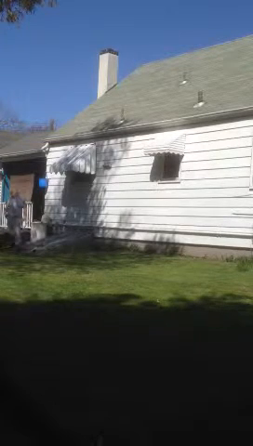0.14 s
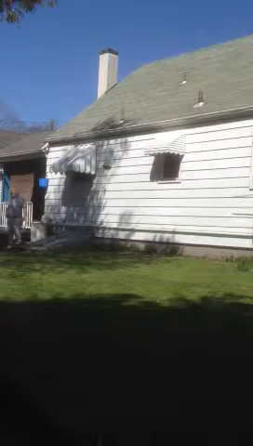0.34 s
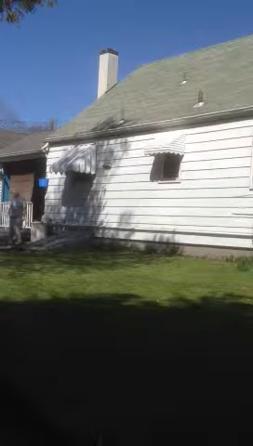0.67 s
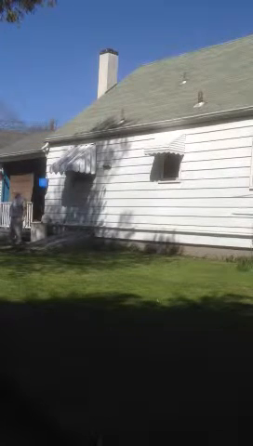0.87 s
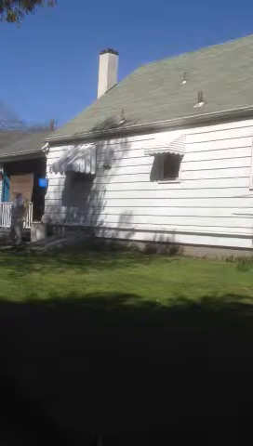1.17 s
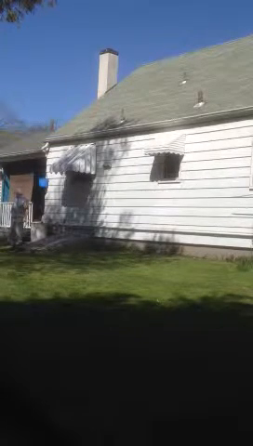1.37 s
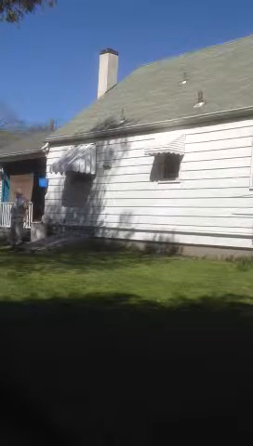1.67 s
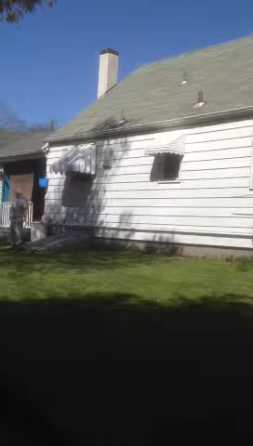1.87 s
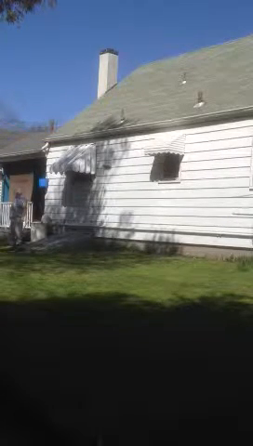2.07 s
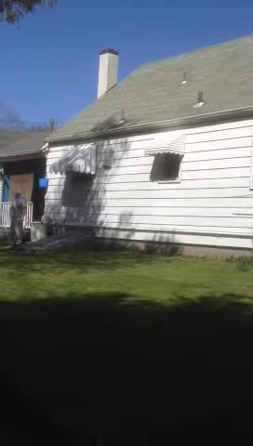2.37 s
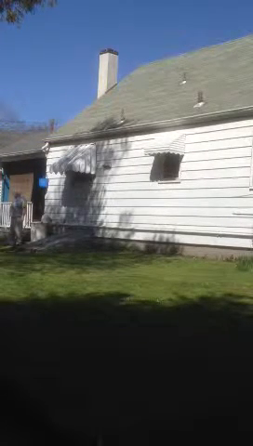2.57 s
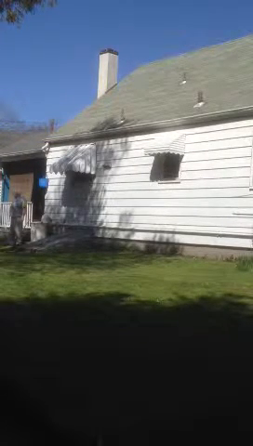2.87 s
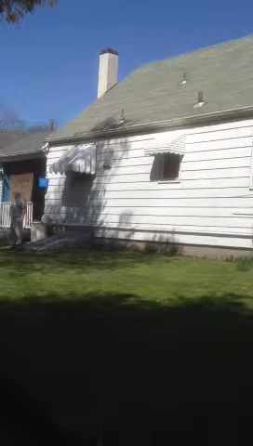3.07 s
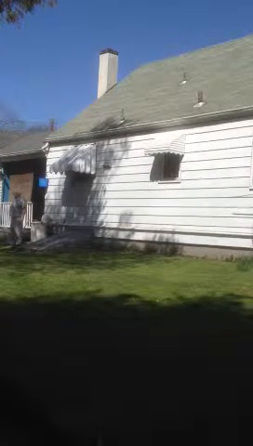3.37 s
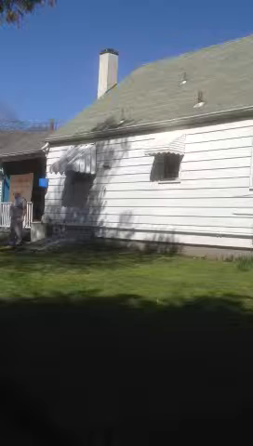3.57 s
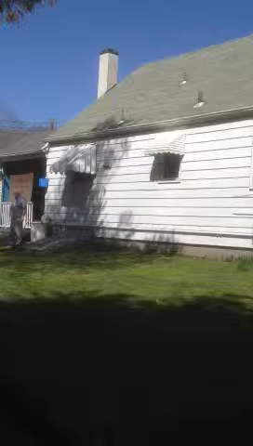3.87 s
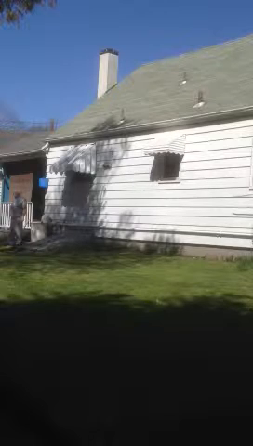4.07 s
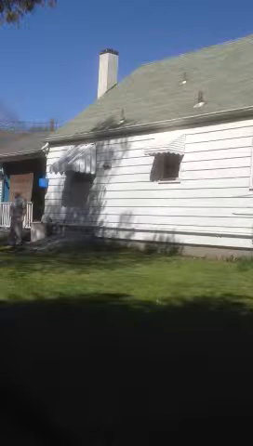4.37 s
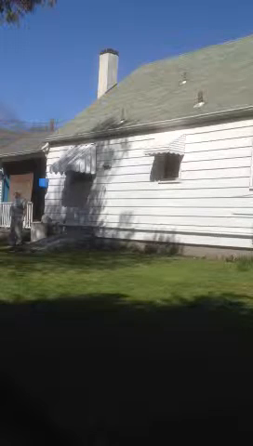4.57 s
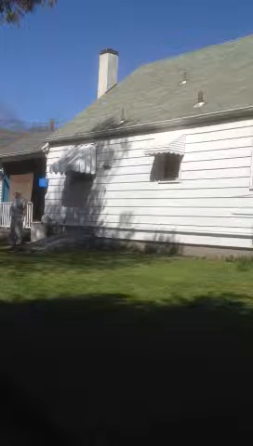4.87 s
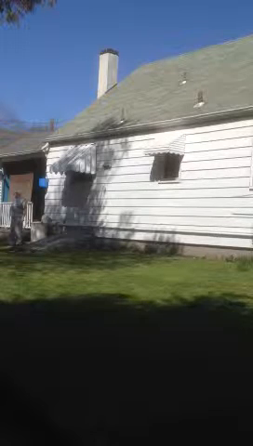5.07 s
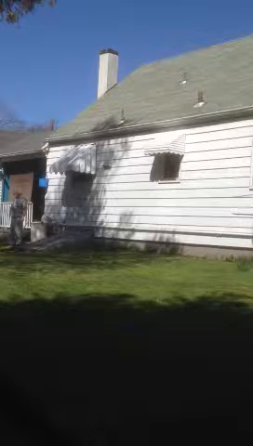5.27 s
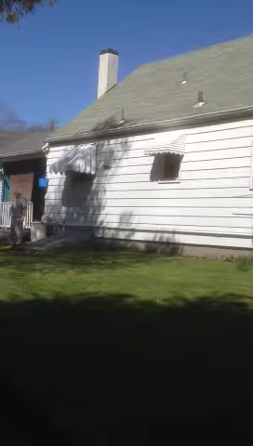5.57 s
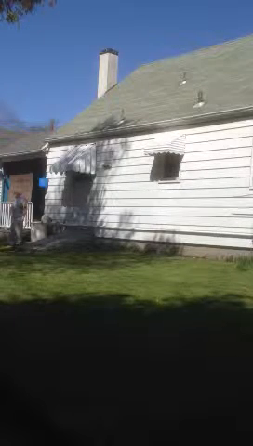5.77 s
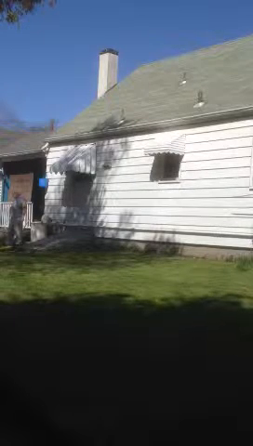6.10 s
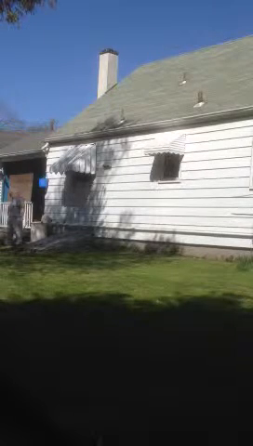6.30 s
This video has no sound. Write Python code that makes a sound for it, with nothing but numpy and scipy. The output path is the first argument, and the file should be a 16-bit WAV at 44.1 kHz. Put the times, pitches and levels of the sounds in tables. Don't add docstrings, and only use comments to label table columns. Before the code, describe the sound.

Open yard beside a house, heard through a phone microphone with its top treble rolled off. From 0 s a small one-cylinder lawn tractor runs steadily, about twenty-seven firings per second, a low buzzing throb coloured by pipe and wall echoes, with bright cooling-air hiss, belt fizz and singing panels. Loose deck metal rattles in the first 0.2 s and again near 1.8 and 2.7 s; a thin bird chip falls around 0.4 s. The hiss recedes until about 2 s, when the tone shifts slightly as it passes the house corner. Near 4 s the ignition is cut: the pitch drops and unburnt air puffs and wheezes through the muffler, louder and hollow around 4.3-4.9 s, stalling near 5.1 s. The residue fades quickly. A small bright latch snap comes at 5.5 s, a faint high chip at 6.15 s, over quiet yard air and a far, slow engine idle.

```python
import sys
import numpy as np
from scipy import signal
from scipy.fft import rfft, irfft
from scipy.io import wavfile
from scipy.ndimage import uniform_filter1d

SR = 44100
rng = np.random.default_rng(int(sys.argv[2]) if len(sys.argv) > 2 else 0)


def amplitude_ratio(level_db):
    exponent = np.asarray(level_db, float) / 20
    return 10 ** exponent


def master_out(mix):
    frames = np.transpose(np.atleast_2d(mix))
    ceiling = np.clip(frames, -1, 1)
    pcm = np.round(ceiling * 32767).astype(np.int16)
    wavfile.write(sys.argv[1], SR, pcm)


N = 284004

# [t/s, engine cycle rate/Hz]
GOVERNED = [(0, 26.6), (.14, 26.8), (.4, 26.35), (.66, 27.2), (.9, 26.9), (1.1, 26.5), (1.5, 26.95),
            (1.88, 27.3), (2.06, 27.1), (2.5, 27.33), (2.7, 27.6), (2.88, 27.36), (3.85, 27.4),
            (4.0, 27.05)]
# [t/s, engine cycle rate/Hz]
COASTDOWN = [
    (4.15, 25.9),
    (4.55, 21.45),
    (4.7, 20.15),
    (5.0, 17.3),
]
SLOWING_PER_S = 10
CUT_S, BURN_OUT_S, STALL_S = 3.98, 0.25, 5.12
TURN_S, TURN_LENGTH_S, WAY_BEFORE, WAY_AFTER = 1.976, 0.21, 0.11, 1
SHADED_DB = -3

# [t/s, level/dB]
EXHAUST = [(0, -23.5), (.35, -23), (1.7, -26), (3.7, -27.5), (4.15, -24), (4.28, -19.5), (4.38, -19),
           (4.46, -20.5), (4.56, -17), (4.66, -23), (4.73, -20), (4.88, -20.5), (5.0, -22.5), (5.14, -26.5),
           (5.22, -34), (5.32, -31), (5.62, -40.5), (6.44, -56)]
# [order, level/dB]
ORDERS_EARLY = [(1, -63), (2, -72), (3, -67), (4, -11), (5, -5), (6, -5), (7, -13.5), (8, -1), (9, -1),
                (10, -12.5), (11, -14), (12, -10.5), (13, -22.5), (14, -28.5), (15, -19.5), (16, -18.5),
                (17, -12), (18, -9.5), (19, -25), (20, -14), (21, -18.5), (22, -54), (23, -64), (24, -17),
                (25, -30), (26, -38), (27, -44), (28, -52), (29, -31), (30, -22.5)]
# [order, level/dB]
ORDERS_LATE = [(1, -60), (2, -50), (3, -47), (4, -7.5), (5, -6.5), (6, -2), (7, -20.5), (8, 1.5), (9, -9),
               (10, -2), (11, -52), (12, -13.5), (13, -18), (14, -12.5), (15, -13.5), (16, -13.5),
               (17, -64), (18, -7.5), (19, -22.5), (20, -34), (21, -25.5), (22, -47), (23, -65), (24, -66),
               (25, -24), (26, -22), (27, -35), (28, -38), (29, -31), (30, -28)]
FIRING_LEAD = .08
# [t/s, f/Hz, level/dB, length/s]
WALL_ECHOES = [(0, 214, -5, .04), (.53, 160, -18, .13), (.4, 238, -3, .05), (.87, 215, -4, .08),
               (.85, 242, -4, .06), (1.06, 160, -8, .05), (1.27, 160, -8, .05), (1.26, 240, -4, .08),
               (1.37, 215, -10, .06), (1.5, 108, -6, .12), (1.64, 161, -11, .045), (1.95, 135, 5, .12),
               (1.5, 135, -3, .25), (1.65, 270, 4, .15), (1.65, 243, -2, .15), (1.53, 163, 3, .05),
               (.2, 108, 4, .12), (1.98, 270, 5, .08), (1.88, 218, -3, .1), (2.2, 136, -11, .2),
               (2.72, 220, -10, .07), (2.77, 276, -13, .05), (2.66, 496, -10, .05), (2.8, 247, 6, .08),
               (2.78, 138, 6, .1), (4.0, 244, 6, .1), (4.02, 163, -5, .12), (1.3, 270, 3, .1),
               (.45, 265, -8, .1), (.45, 106, -4, .1), (.45, 477, -6, .08), (1.72, 190, 11, .2),
               (1.72, 216, 2, .15), (1.0, 135, -3, .2), (.85, 350, 6, .2), (.8, 377, 9, .2),
               (.85, 458, 5, .2), (1.27, 350, 7, .2), (2.3, 542, 9, .25), (2.3, 244, 4, .25),
               (2.72, 408, 7, .08), (3.7, 352, 6, .25), (3.7, 380, 3, .25), (.8, 270, 4, .15),
               (.4, 297, 6, .15), (1.7, 378, 4, .2)]
# [f/Hz, level/dB]
STRONG_PITCHES = [(162, 0.5), (216, 3), (243, 3.5)]
ECHO_WIDTH_HZ = 12
# [f/Hz, level/dB per Hz]
RUMBLE = [(15, -86), (25, -60), (54, -44), (72, -49), (102, -15.5), (172, -7.5), (230, -4), (310, -12),
          (380, -23), (500, -14), (650, -51), (1100, -100)]

# [f/Hz, width/Hz, level/dB]
MUFFLER = [(63, 9, -19.5), (135, 14, -20), (152, 11, -13), (180.5, 14, -11), (208, 12, -11), (287, 16, -8),
           (318, 18, -11), (390, 12, -17), (450, 16, -17), (490, 14, -14), (560, 20, -19)]
# [delay t/s, level/dB]
PUFF_ECHOES = [
    (0, 0),
    (.0071, -3),
    (.0142, -10),
    (.0247, -10),
    (.0287, -6.5),
    (.039, -12),
    (.0535, -14),
]
PUFF_HZ, PUFF_S, PUFF_AT = 240, .002, .23
PUFF_DB, PUFF_FADE_DB_PER_S = -7.5, -23
# [order, level/dB against puffs, ring f/Hz, width/Hz]
COAST_ORDERS = [(7, -6.5, 167, 46.3), (10, -14, 208, 20), (11, -6, 197, 20), (12, -3.5, 290, 15),
                (14, -8, 280, 14), (17, -5.5, 326, 17), (18, -11.5, 465, 28), (16, -17, 385, 14)]

# [f/Hz, level/dB per Hz]
DRONE = [(210, -47), (350, -19), (400, -13), (490, -7.5), (620, -16.5), (700, -18), (1290, -21),
         (1600, -23), (2080, -47), (3500, -110)]
# [f/Hz, level/dB per Hz]
HISS = [(530, -12.5), (900, 0), (1310, -11), (1650, 0), (1860, -1.5), (2230, 1), (2440, -0.5), (2700, 0.5),
        (3270, -2), (3800, -7.5), (4380, -10), (5040, -5.5), (5800, -5.5), (6960, -1.5), (10000, -19.5),
        (13000, -21), (22000, -120)]
# [f/Hz, level/dB per Hz]
FIZZ = [(4710, -20.5), (8000, -5.5), (9550, -12.5), (13700, -12.5), (14600, -15), (15200, -20)]
# [early f/Hz, late f/Hz, width/Hz, early level/dB, late level/dB against hiss]
PANELS = [(2244, 2290, 29, -18, -14.5), (2716, 2680, 114, -13, -14), (1670, 1600, 220, -20, -14.5),
          (3255, 3170, 61, -16.5, -15.5), (5180, 5190, 140, -17, -14), (4770, 4800, 180, -14, -26),
          (6350, 6380, 150, -12, -20), (6920, 6400, 92, -10, -61), (7560, 7500, 390, -18, -28)]
# [f/Hz at full speed, level/dB]
WHINES = [(877.5, -58), (931.3, -76), (958.2, -62), (985.1, -62), (1093, -68), (1120, -58), (1367, -59.5),
          (1394, -63), (1475, -58.5)]
DRONE_DB, HISS_DB, FIZZ_DB = -36.5, -33, -45
PARKED_S, AWAY_DB = 2.17, -8.5
FULL_SPEED, SPIN_DB, SPIN_POWER, REST_DB = 29.5, -35, 2.21, -22
STALL_DROP_S, STALL_DROP_DB = 5.26, -2
FIZZ_AWAY, FIZZ_SPIN = 1.2, 0.41
BELT_S, BELT_LENGTH_S, BELT_DB = 4.48, 0.62, 6
WHEEZE, WHEEZE_AT, WHEEZE_LENGTH = .7, .3, .2

# [t/s, level/dB, length/s, centre f/Hz, width/octaves]
RATTLES = [(0.127, -35.5, 0.057, 6130, 0.7), (0.0, -30, 0.067, 490, 0.52), (0.014, -19.5, 0.037, 290, 0.22),
           (0.118, -27, 0.032, 527, 0.5), (0.146, -25, 0.039, 527, 0.52), (1.834, -44, 0.057, 1170, 0.31),
           (0.141, -38.5, 0.056, 1160, 0.19), (1.62, -45.5, 0.11, 810, 0.1), (1.802, -38, 0.24, 510, 0.13),
           (2.703, -37.5, 0.18, 480, 0.29), (0.29, -36, 0.053, 6160, 0.49), (0.46, -36, 0.047, 6350, 0.5),
           (0.544, -43, .03, 10000, 1.5), (1.698, -45, 0.032, 10000, 1.4), (1.802, -39.5, 0.1, 6900, 0.42),
           (1.84, -47, 0.06, 9260, 1.2), (4.467, -46, 0.051, 9030, 1.3), (4.899, -52, 0.1, 7700, 0.9),
           (4.96, -44, 0.028, 7300, 0.34), (5.043, -59, 0.033, 7560, 1.5), (5.183, -52, 0.027, 7003, 1.5),
           (5.754, -59, 0.015, 7300, 1.1), (5.984, -56, .02, 7000, 0.52), (6.237, -58, 0.032, 2080, .4)]
# [t/s, level/dB, t60/s]
LATCH = (5.519, -38, 0.14)
# [f/Hz, level/dB per Hz]
LATCH_COLOUR = [(710, -45), (1200, -21), (1450, -38), (1600, -17), (2000, -12.5), (5370, -15), (6780, -8.5),
                (7950, -13), (15200, -19)]
# [f/Hz, level/dB, t60/s]
LATCH_RINGS = [(6550, 0, 0.035), (6900, 4.5, 0.036), (4760, -6, 0.04), (5730, -16, 0.04), (1965, -18, 0.05),
               (3900, -4.5, 0.035), (2840, -7, 0.035), (8500, -17, .03)]
# [delay t/s, level/dB]
LATCH_BOUNCES = [
    (0, -6),
    (.0025, 3),
    (.008, -9),
    (.0135, -3),
    (.0195, -9),
    (.024, -12),
    (.031, -13),
]
# [t/s, level/dB, length/s, start f/Hz, end f/Hz]
CHIPS = [
    (0.374, -32.5, 0.037, 8050, 7800),
    (0.414, -40, .02, 7950, 7860),
    (3.71, -62, .042, 14100, 14000),
    (3.745, -65, .018, 12400, 12500),
    (3.765, -65, .03, 11850, 11700),
    (6.158, -54, 0.033, 11250, 11300),
    (6.2, -70, 0.066, 11500, 11300),
]

# [order, level/dB]
FAR_ORDERS = [(1, -57), (2, -62), (3, -53), (4, -54), (5, -25), (6, -22), (7, -19), (8, -9.5), (9, -24),
              (10, -5), (11, -2.5), (12, -3), (13, -5), (14, -26), (15, -5.5), (16, -9.5), (17, -12.5),
              (18, -7.5), (19, -12), (20, -7), (21, -11), (22, -8), (23, -17), (24, -19), (25, -23),
              (26, -28)]
FAR_HZ = 13.45
FAR_DB, FAR_LATE_DB = -40, -47.5
FAR_RING_DB, FAR_RING_LATE_DB = -4, 9.5
# [f/Hz, level/dB per Hz]
YARD = [(15, -70), (25, -40), (53, -44), (168, 5), (214, -12), (272, -5), (320, 4), (715, -21), (1690, -33),
        (2590, -31), (4200, -50), (7370, -19), (9640, -49), (12600, -44), (15200, -55)]
YARD_DB = -53.5


def evened(x):
    return x / np.sqrt(np.mean(x ** 2) + 1e-20)


def read(points, hz):
    f, value = np.transpose(points)
    return np.interp(np.log(hz + 1), np.log(f + 1), value)


def curve(rows):
    s, value = np.transpose(rows)
    return np.interp(np.arange(N) / SR, s, value)


def ramp(start, length):
    u = np.clip((np.arange(N) / SR - start) / length, 0, 1)
    return u * u * (3 - 2 * u)


def wander(count, rate_hz):
    t = np.arange(0, N / SR + .02, .01)
    f = np.geomspace(0.0995 * rate_hz, rate_hz, 16)[:, None]
    rows = []
    for _ in range(count):
        waves = np.sin(2 * np.pi * (f * t + rng.random(f.shape))) / np.sqrt(f)
        rows.append(np.interp(np.arange(N) / SR, t, evened(waves.sum(0))))
    return rows


def noise(spectrum, patchy_db, size=1024):
    hz = np.fft.rfftfreq(size, 1 / SR)
    a, b, patches = rng.standard_normal((N * 4 // size + 5, len(hz), 3)).T
    patches = evened(uniform_filter1d(uniform_filter1d(patches, 10, 0), 10, 1))
    z = (a + 1j * b) * amplitude_ratio(read(spectrum, hz)[:, None] + patchy_db * patches)
    return evened(signal.istft(z, nperseg=size, noverlap=size * 3 // 4)[1][:N])


def resonate(x, hz, width):
    turn = np.exp(2j * np.pi * np.cumsum(hz) / SR)
    r = np.exp(-np.pi * width / SR)
    return 2 * (turn * signal.lfilter([(1 - r) ** 2], [1, -2 * r, r * r], x / turn)).real


def add(mix, s, sound):
    part = mix[round(s * SR):][:len(sound)]
    part += sound[:len(part)]


def orders(turns, levels_db, scatter, drift_db, drift_rad, rate_hz):
    count = len(levels_db)
    drifts = np.array(wander(count=2 * count, rate_hz=rate_hz))[:, :len(turns)]
    lags = .027 * np.clip(np.arange(count) - 7.5, -5, 5) ** 2 + scatter * rng.random(count)
    throb = np.zeros(len(turns))
    for k, db in enumerate(levels_db):
        phase = 2 * np.pi * ((k + 1) * turns + lags[k]) + drift_rad * drifts[2 * k + 1]
        throb -= amplitude_ratio(db + drift_db * drifts[2 * k]) * np.cos(phase)
    return throb


def speed():
    t = np.arange(N) / SR
    beyond = np.maximum(t - COASTDOWN[-1][0], 0)
    return np.maximum(curve(GOVERNED + COASTDOWN) - SLOWING_PER_S * beyond, 1)


def cycles(start=.33):
    return start + np.cumsum(speed()) / SR


def exhaust(turns, way):
    firing, exhaust_db = 1 - ramp(CUT_S, BURN_OUT_S), curve(EXHAUST)
    blast = turns + FIRING_LEAD
    lit = np.count_nonzero(firing)
    levels_db = []
    for (order, early), (_, late) in zip(ORDERS_EARLY, ORDERS_LATE):
        db = exhaust_db - 2.5 + (1 - way) * early + way * late + echo_db(order)
        levels_db.append(db[:lit])
    fired = np.zeros(N)
    fired[:lit] = orders(blast[:lit], levels_db, scatter=.33, drift_db=.8, drift_rad=.2, rate_hz=1.5)

    gate = 1 + .7 * np.cos(2 * np.pi * blast)
    flow_db = -11.5 + (SHADED_DB * way - 6.5) * firing
    flow = amplitude_ratio(flow_db) * evened(gate * noise(RUMBLE, patchy_db=0.0, size=4096))
    puff_db = PUFF_DB + PUFF_FADE_DB_PER_S * np.maximum(np.arange(N) / SR - STALL_S, 0)
    pumped = np.sqrt(1 - firing) * amplitude_ratio(puff_db) * coasting(turns)
    return np.sqrt(firing) * fired + amplitude_ratio(exhaust_db) * (pumped + flow)


def echo_db(order):
    t, hz = np.arange(0, N / SR, .01), order * 27
    gain_db = np.zeros(len(t))
    for s, f, db, length in WALL_ECHOES:
        gain_db += db * np.exp(-((hz - f) / ECHO_WIDTH_HZ) ** 2) * np.exp(-((t - s) / length) ** 2)
    for f, db in STRONG_PITCHES:
        gain_db += db * np.exp(-((hz - f) / ECHO_WIDTH_HZ) ** 2)
    return np.interp(np.arange(N) / SR, t, gain_db)


def coasting(turns):
    rate, glides = speed(), np.zeros(N)
    for (k, db, hz, width), d in zip(COAST_ORDERS, wander(count=len(COAST_ORDERS), rate_hz=5.0)):
        crossing = np.exp(-((k * rate - hz) / width) ** 2)
        glides += amplitude_ratio(db + 3 + 1.5 * d) * crossing * np.cos(2 * np.pi * k * turns + .3 * d)
    return amplitude_ratio(0.5) * pumping(turns) + glides


def pumping(turns):
    puffs, lead = np.zeros(N), 800
    at = np.flatnonzero(np.diff(np.floor(turns - PUFF_AT)) > 0)
    puffs[at] = amplitude_ratio(1.2 * rng.standard_normal(800)[:len(at)])
    t = (np.arange(9000) - lead) / SR
    ring = np.zeros(len(t))
    for s, db in PUFF_ECHOES:
        swing = np.cos(2 * np.pi * PUFF_HZ * (t - s) + .35)
        ring -= amplitude_ratio(db) * np.exp(-.5 * ((t - s) / PUFF_S) ** 2) * swing
    swell = (1 + np.tanh(t / PUFF_S)) / 2
    for f, width, db in MUFFLER:
        ring -= swell * amplitude_ratio(db) * np.exp(-np.pi * width * t) * np.cos(2 * np.pi * f * t)
    low_cut = signal.butter(2, 108, "highpass", fs=SR, output="sos")
    return evened(signal.sosfiltfilt(low_cut, signal.oaconvolve(puffs, ring)[lead:lead + N]))


def casing(turns, way):
    drone_db, hiss_db, fizz_db = casing_db(way)
    firing = 1 - ramp(CUT_S, BURN_OUT_S)
    gate = 1 + (0.5 - 0.81 * way) * np.exp(-(turns % 1) / 0.077)
    gate += 0.046 * np.exp(-(2 * turns % 1) / 0.12)
    ticks = amplitude_ratio(0.25 * np.minimum(rng.exponential(1, N), 5)) * (rng.random(N) < 90 / SR)
    gate += 0.073 * signal.lfilter([1], [1, -np.exp(-1 / (0.027 * SR))], ticks)

    drone = amplitude_ratio(drone_db - 2.6) * evened(gate * noise(DRONE, patchy_db=1.3))
    hiss = evened(gate * noise(HISS, patchy_db=0.5, size=512))
    fizz = amplitude_ratio(fizz_db) * evened(gate * noise(FIZZ, patchy_db=2.0, size=512))
    clatter = gate * rng.standard_normal(N)
    for panel, d in zip(PANELS, wander(count=len(PANELS), rate_hz=6.0)):
        early_hz, late_hz, width, early_db, late_db = panel
        sung = evened(resonate(clatter, early_hz + way * (late_hz - early_hz) + 25 * d, width))
        hiss += (0.4 + 0.65 * firing) * amplitude_ratio(early_db + way * (late_db - early_db)) * sung

    wheezing = ramp(CUT_S + 0.23, 0.27) - 1.1 * ramp(STALL_S, .2)
    breath = np.exp(-((turns - WHEEZE_AT) % 1) / WHEEZE_LENGTH) - WHEEZE_LENGTH
    wheeze = 1 + WHEEZE * wheezing * breath
    share, whines = turns / 27.37, np.zeros(N)
    for (f, db), d in zip(WHINES, wander(count=len(WHINES), rate_hz=5.0)):
        whines += amplitude_ratio(db + 3 + 2.5 * d) * np.sin(2 * np.pi * f * share + .9 * d)
    return drone + amplitude_ratio(hiss_db - 0.92) * np.sqrt(wheeze) * hiss + wheeze * fizz + way * firing * whines


def casing_db(way):
    t = np.arange(N) / SR
    away_db = AWAY_DB * np.minimum(t / PARKED_S, 1)
    lost = np.clip(1 - speed() / FULL_SPEED, 0, 1)
    turning_db = SPIN_DB * lost ** SPIN_POWER + STALL_DROP_DB * ramp(STALL_DROP_S, 0.12)
    spin_db = 10 * np.log10(amplitude_ratio(2 * turning_db) + amplitude_ratio(2 * REST_DB))
    belt_db = BELT_DB * np.exp(-((t - BELT_S) / BELT_LENGTH_S) ** 2)
    drone_db = DRONE_DB + SHADED_DB * way + spin_db
    hiss_db = HISS_DB + away_db + spin_db
    fizz_db = FIZZ_DB + FIZZ_AWAY * away_db + FIZZ_SPIN * spin_db + belt_db
    return drone_db, hiss_db, fizz_db


def rattles():
    out, t = np.zeros(N), np.arange(8192) / SR
    f = np.fft.rfftfreq(len(t), 1 / SR)
    for s, db, length, hz, octaves in RATTLES:
        band = np.exp(-(np.log2((f + 1) / hz) / octaves) ** 2)
        burst = evened(irfft(rfft(rng.standard_normal(len(t))) * band))
        add(out, s, amplitude_ratio(db) * burst * np.minimum(t / 0.0048, 1) * np.exp(-(t / length) ** 2))
    return out


def latch():
    s, db, t60 = LATCH
    t, out = np.arange(12000) / SR, np.zeros(N)
    colour = amplitude_ratio(read(LATCH_COLOUR, np.fft.rfftfreq(len(t), 1 / SR)))
    burst = evened(irfft(rfft(rng.standard_normal(len(t))) * colour))
    tail = amplitude_ratio(-60 * np.maximum(t - .015, 0) / t60) + amplitude_ratio(-13.0 - 60 * t / .6)
    add(out, s, amplitude_ratio(db - 3.5) * np.minimum(t / 0.0027, 1) * burst * tail)
    rings = sum(amplitude_ratio(g - 60 * t / ring) * np.sin(2 * np.pi * f * t) for f, g, ring in LATCH_RINGS)
    for delay, bounce_db in LATCH_BOUNCES:
        add(out, s + delay, amplitude_ratio(db + bounce_db - 1.0) * np.minimum(t / 0.0006, 1) * rings)
    return out


def chips():
    out = np.zeros(N)
    for s, db, length, start_hz, end_hz in CHIPS:
        t = np.arange(0, length, 1 / SR)
        husk = 1 + 0.15 * evened(uniform_filter1d(rng.standard_normal(6000), 80))[:len(t)]
        tone = np.sin(2 * np.pi * np.cumsum(start_hz + (end_hz - start_hz) * t / length) / SR)
        add(out, s, amplitude_ratio(db) * husk * tone * signal.windows.tukey(len(t), .3))
    return out


def far_engine():
    far_db = FAR_DB + ramp(4.91, 1.65) * (FAR_LATE_DB - FAR_DB)
    ring_db = FAR_RING_DB + ramp(5.53, 1.0) * (FAR_RING_LATE_DB - FAR_RING_DB)
    levels_db = [ring_db if order == 13 else db for order, db in FAR_ORDERS]
    turns = FAR_HZ * np.arange(N) / SR
    idle = orders(turns, levels_db, scatter=0.91, drift_db=2.5, drift_rad=0.12, rate_hz=2.48)
    return amplitude_ratio(far_db) * (idle + amplitude_ratio(-4.0) * noise(RUMBLE, patchy_db=5.0, size=4096))


def yard_air():
    return amplitude_ratio(YARD_DB) * noise(YARD, patchy_db=1.6)


def scene():
    turned = ramp(TURN_S - TURN_LENGTH_S / 2, TURN_LENGTH_S)
    turns, way = cycles(), WAY_BEFORE + (WAY_AFTER - WAY_BEFORE) * turned
    tractor = exhaust(turns, way) + casing(turns, way)
    events = rattles() + latch() + chips()
    return (tractor + events + far_engine() + yard_air())[None]


def top_cut(x):
    return signal.sosfilt(signal.butter(12, 15360, fs=SR, output="sos"), x)


def record(dry):
    edge = signal.firwin(511, 15400, window=("kaiser", 9), fs=SR)
    mix = signal.oaconvolve(dry, edge[None], "same")
    return top_cut(mix)


dry = scene()
out = record(dry)
master_out(out)
```